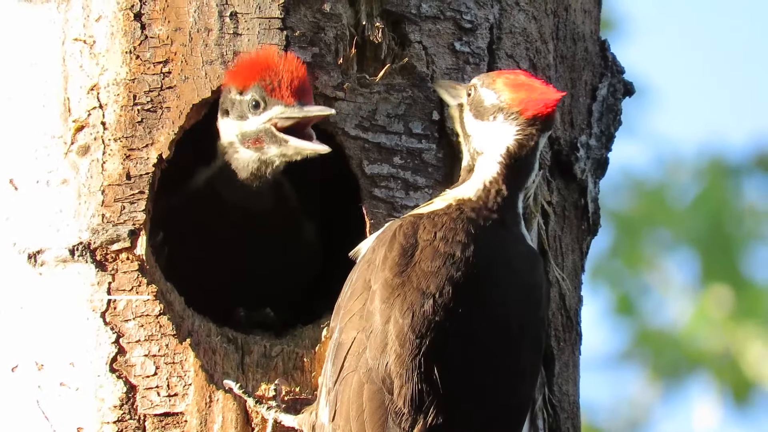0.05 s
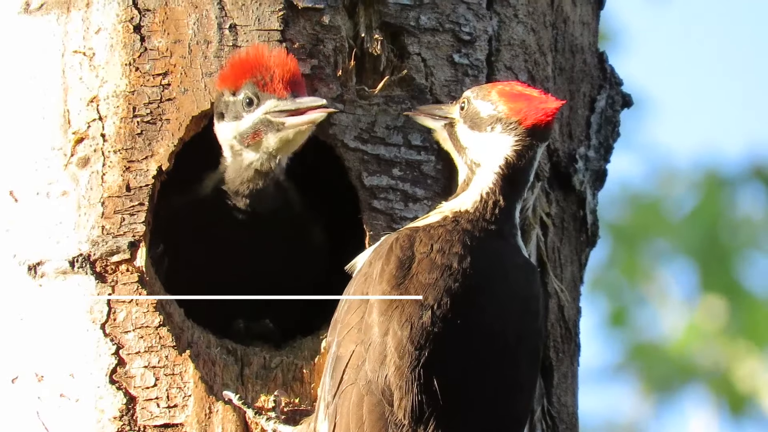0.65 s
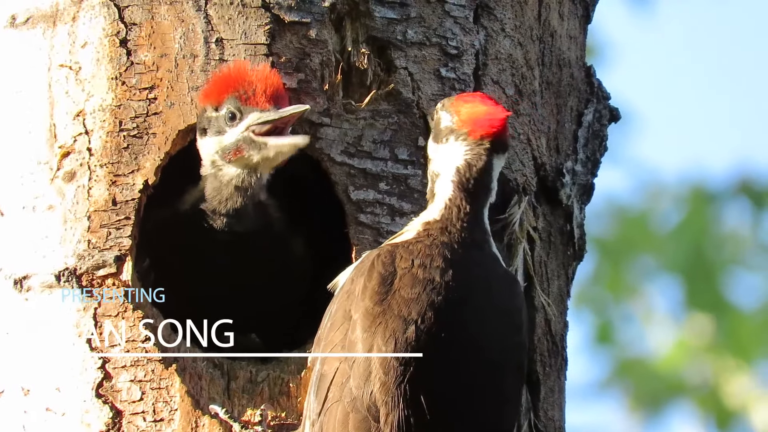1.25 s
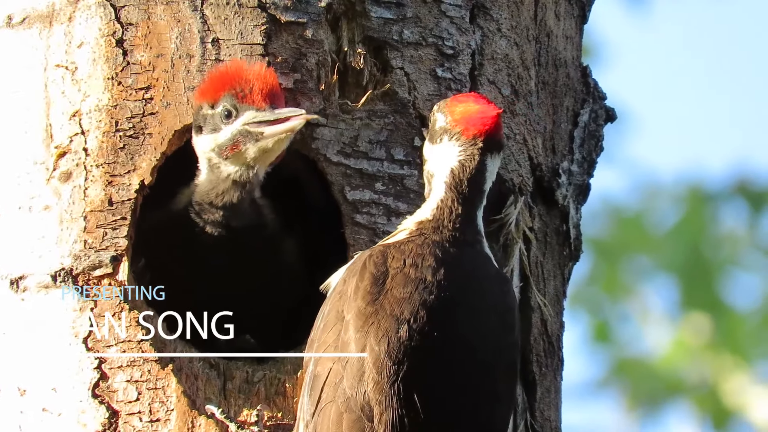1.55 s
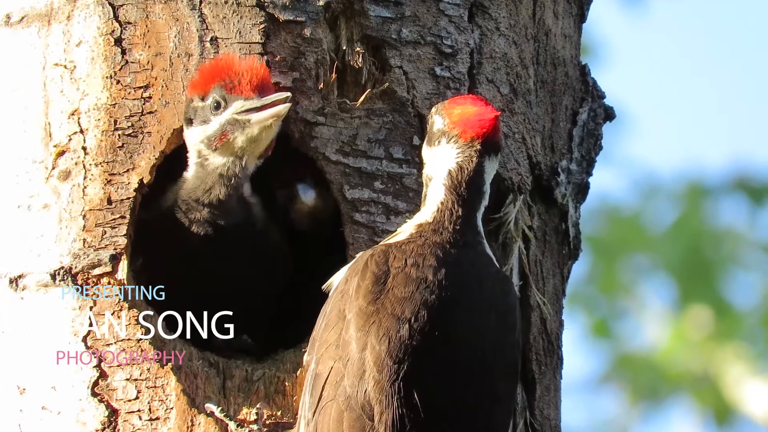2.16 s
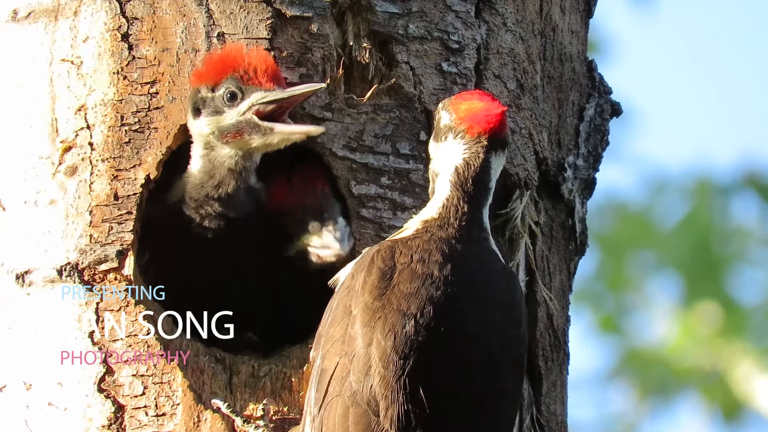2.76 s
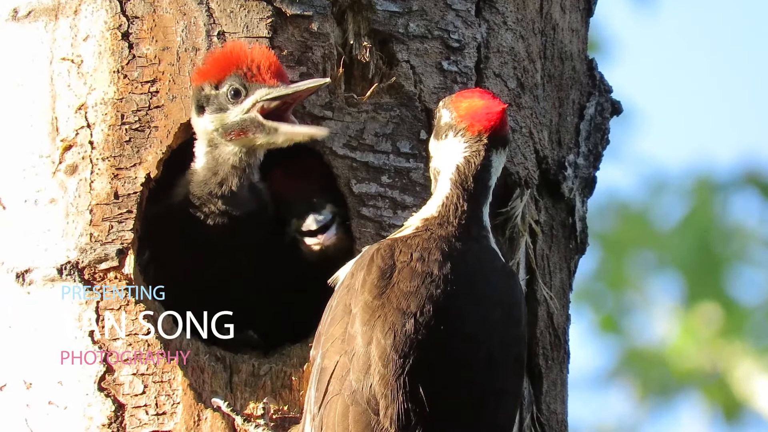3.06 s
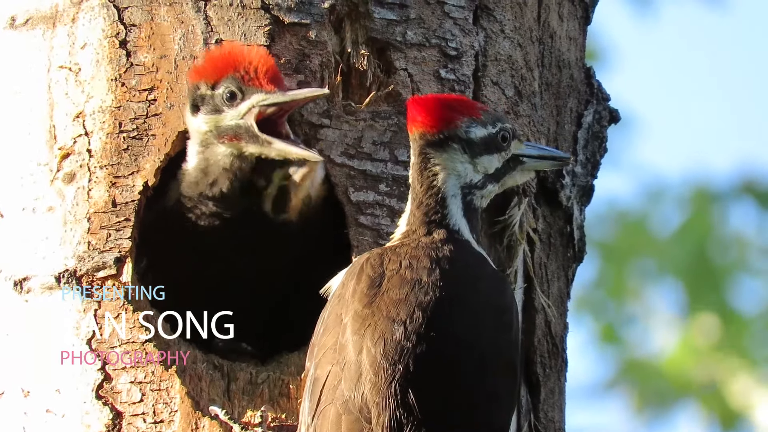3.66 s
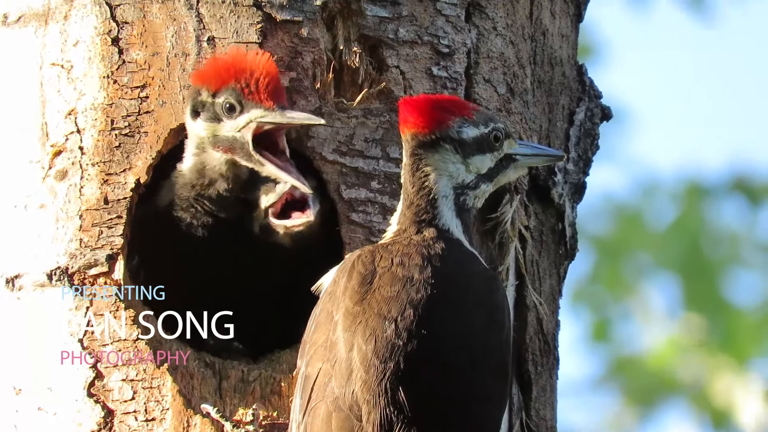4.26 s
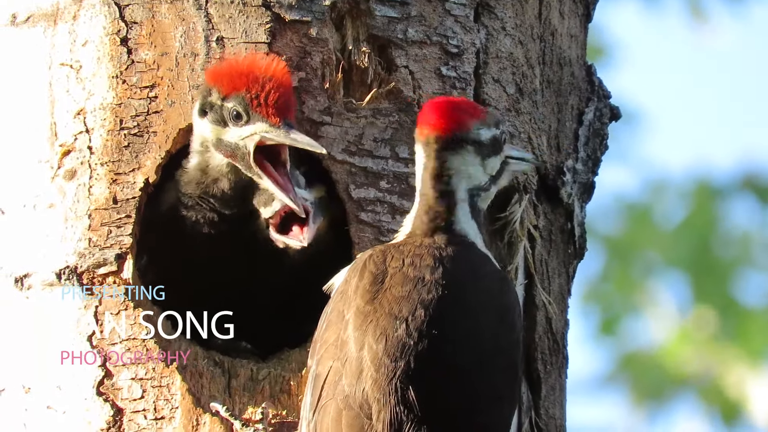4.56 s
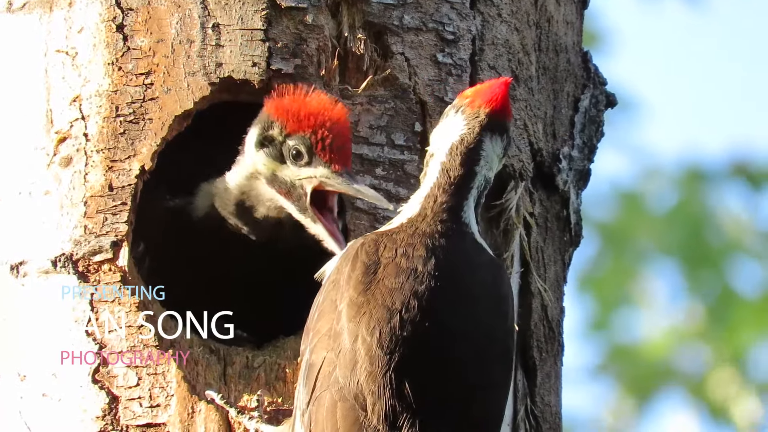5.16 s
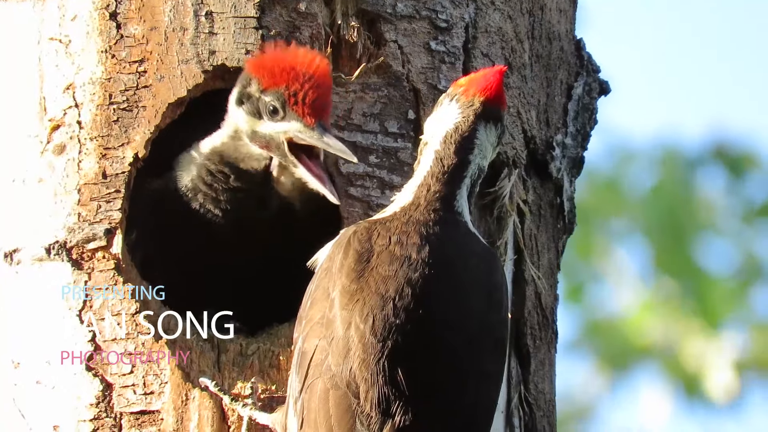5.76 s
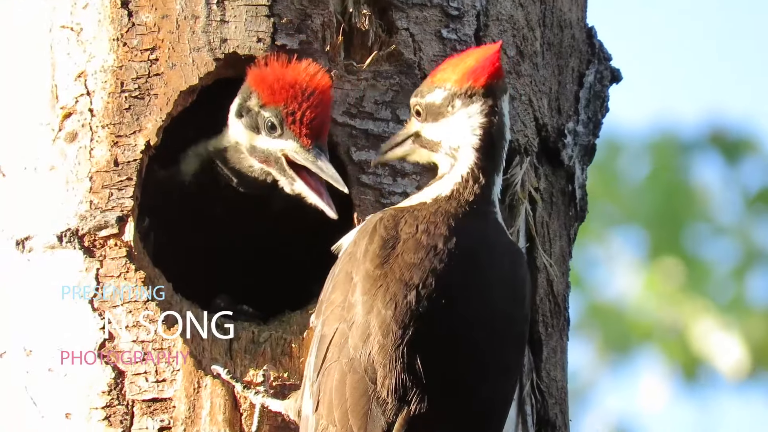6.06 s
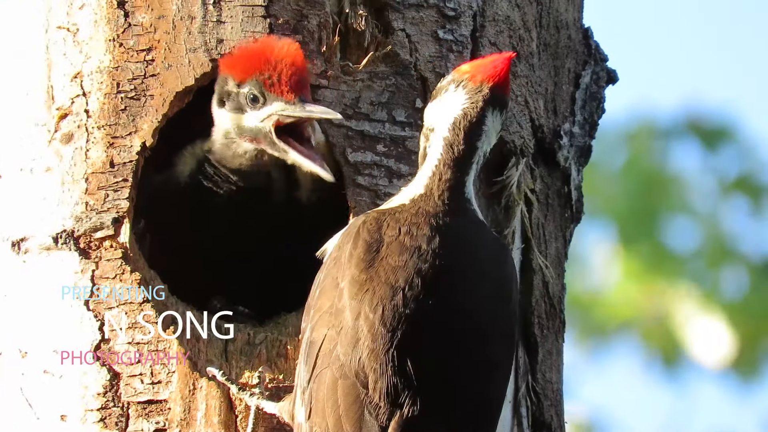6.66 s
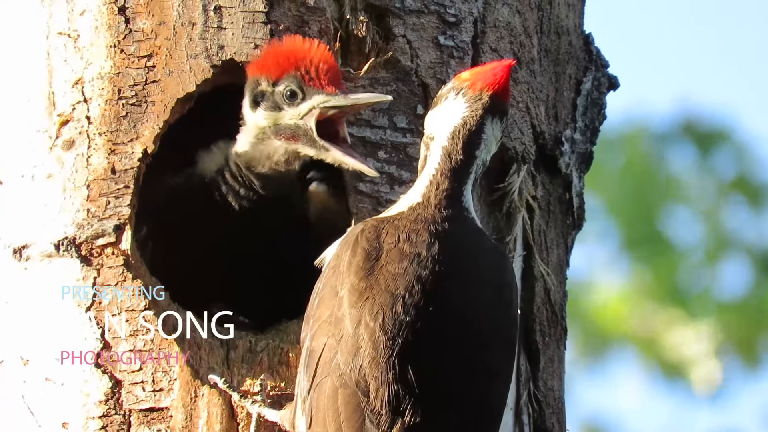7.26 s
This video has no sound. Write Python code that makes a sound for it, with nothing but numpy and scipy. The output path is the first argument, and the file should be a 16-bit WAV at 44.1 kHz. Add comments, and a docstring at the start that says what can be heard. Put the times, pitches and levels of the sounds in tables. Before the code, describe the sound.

Outdoors among trees, a young woodpecker squawks for food in a steady, rasping rhythm from start to finish, its voice ringing slightly in the nest hollow. Light taps on wood, brief crackles and thin bird whistles come in between. A low wash of far traffic lies behind the calls and swells a little once, after the middle, as a distant vehicle passes.

```python
"""Far traffic washes from the start. A woodpecker nestling begs from its hole in a trunk: raspy squawks,
three or four a second, each a train of uneven clicks ringing in its throat, then in the hollow and woods.
Small knocks on wood, scratchy crackles and faint whistles of other birds fall in between.
For four seconds a stretch of six squawks goes round in a loop; a brief crackly hiss fades as it ends.
The begging runs on, changing colour as the head moves, and a far vehicle swells past at about 5.4 s."""
import sys
import numpy as np
from scipy import signal
from scipy.fft import rfft, irfft, next_fast_len
from scipy.io import wavfile

SR = 44100
rng = np.random.default_rng(int(sys.argv[2]) if len(sys.argv) > 2 else 0)


def inscribe(sig):
    """Save sig as 16-bit PCM at rate SR to the path in sys.argv[1].

    A 1-D sig is mono; a 2-D sig holds one channel per row.
    Samples are clipped to [-1, 1] before scaling.
    """
    pcm = np.round(np.clip(np.atleast_2d(sig).T, -1, 1) * 32767)
    wavfile.write(sys.argv[1], SR, pcm.astype(np.int16))


N = 326781
TIME = np.arange(N) / SR


def from_db(db):
    return 10 ** (np.asarray(db) / 20)


def rms(x):
    return np.sqrt(np.mean(x ** 2) + 1e-20)


def at_hz(points, hz):
    """Reads a curve on a log-frequency axis."""
    freqs, values = np.transpose(points)
    return np.interp(np.log(hz + 1e-6), np.log(freqs), values)


def band(x, low_hz, high_hz, order=3):
    """Causal band-pass."""
    return signal.sosfilt(signal.butter(order, [low_hz, high_hz], "band", fs=SR, output="sos"), x)


def colour(x, spectrum):
    """Minimum-phase EQ: it rings after each click, never before."""
    size = next_fast_len(x.shape[-1] // 2 + 1024) * 2
    gain = from_db(at_hz(spectrum, np.fft.rfftfreq(size, 1 / SR)))
    cepstrum = irfft(np.log(gain))
    cepstrum[1:size // 2] *= 2
    cepstrum[size // 2 + 1:] = 0
    return irfft(rfft(x, size) * np.exp(rfft(cepstrum)))[..., :x.shape[-1]]


def isolate(x, low_hz, high_hz):
    """The share of a sound between two frequencies, with soft edges."""
    hz = np.fft.rfftfreq(x.shape[-1], 1 / SR) + 1
    return irfft(rfft(x) / (1 + (low_hz / hz) ** 24) / (1 + (hz / high_hz) ** 24), x.shape[-1])


def add(out, start_s, sound):
    """Mixes a sound in at its cue."""
    i = max(int(start_s * SR), 0)
    out[..., i:i + sound.shape[-1]] += sound[..., :N - i]


def arch(length_s):
    """A half-sine fade in and out."""
    return np.sin(np.linspace(0, np.pi, int(length_s * SR)))


def glide(pitches, size):
    """A pitch bending smoothly through its start, middle and end."""
    bend = np.polyfit([0, .5, 1], np.log(pitches), 2)
    return np.exp(np.polyval(bend, np.linspace(0, 1, size)))


def stereo_noise(spectrum):
    """A steady noise bed, centred in the bass and wider higher up."""
    # how alike the two ears are: f/Hz, likeness/0-1
    likeness = [(60, .998), (110, .992), (170, .82), (250, .22), (380, .35), (550, .78), (800, .78),
                (1200, .62), (2000, .45), (12000, .3)]
    size = next_fast_len(N)
    hz = np.fft.rfftfreq(size, 1 / SR)
    mid, side = rfft(rng.standard_normal((2, size))) * from_db(at_hz(spectrum, hz))
    alike = at_hz(likeness, hz)
    return irfft(np.sqrt(1 + alike) * mid + np.sqrt(1 - alike) * side * [[1], [-1]], size)[:, :N]


def traffic(wash_db=-44.5, rumble_db=-46.5, hum_hz=120, hum_db=-55, pass_s=5.4, pass_width_s=.24):
    """Far tyres and leaves wash over a faint hum; the engine rumble swells once as a vehicle passes."""
    # colour of tyres and leaves: f/Hz, level/dB
    wash_eq = [(90, -25), (170, -3), (260, -2), (380, 1), (600, 0), (830, -1), (1050, -6), (1300, -12),
               (1800, -19), (2500, -25), (5000, -33), (9000, -42), (13000, -52), (16000, -64)]
    # colour of far engines: f/Hz, level/dB
    engine_eq = [(20, -25), (32, -16.5), (45, -14), (65, -1), (100, 0), (125, -0.5), (160, -2.5), (200, -8),
                 (260, -13.5), (500, -56)]
    wash, engines = stereo_noise(wash_eq), stereo_noise(engine_eq)
    wash = wash * from_db(wash_db) / rms(band(wash.mean(axis=0), 200, 1100))
    swell_db = 4 / (1 + ((TIME - pass_s) / pass_width_s) ** 2)
    rumble = from_db(rumble_db + swell_db) * engines / rms(engines)
    hum = from_db(hum_db) * np.sqrt(2) * np.sin(2 * np.pi * hum_hz * TIME)
    return wash + rumble + hum


def knocks(contact_s=.00057, crack_db=-9, crack_s=.0018):
    """A short dry crack sets the wood ringing for a moment, differently at every touch."""
    # small knocks on wood: t/s, pitch/Hz, gain/dB
    cues = [(1.443, 1430, -43), (1.606, 1390, -42), (1.754, 800, -50), (4.057, 1400, -44),
            (4.32, 1410, -33), (5.975, 1460, -45), (6.056, 1500, -48), (6.308, 1380, -43),
            (7.115, 1380, -41), (7.316, 1420, -37.5), (7.368, 1350, -37)]
    # modes of the wood: multiple of the pitch, level/dB, t60/s
    wood_modes = [(.72, -5, 0.014), (.86, -2, 0.012), (1, 3.5, 0.029), (1.13, -4, 0.013), (1.55, -3, 0.014),
                  (2.1, -17, .01)]
    out, t = np.zeros(N), TIME[:SR // 16]
    attack = 1 - np.exp(-t / contact_s)
    for start, hz, db in cues:
        ring = sum(from_db(mode_db - 60 * t / t60) * np.sin(2 * np.pi * (hz * ratio * t + rng.random()))
                   for ratio, mode_db, t60 in wood_modes)
        noise = band(rng.standard_normal(len(t)), 800, 2500, order=1)
        crack = from_db(crack_db) * noise / rms(noise) * np.exp(-t / crack_s)
        add(out, start, from_db(db) * (ring + crack) * attack)
    return out


def reflections(size):
    """Countless reflections as the two ears get them."""
    # stereo width of the reflections: f/Hz, side against mid/dB
    width_eq = [(1000, -3), (3000, -11.5), (6000, -6), (12000, 1)]
    mid, side = rng.standard_normal((2, size))
    return mid + colour(side, width_eq) * [[1], [-1]]


def trunk(x, scatter_s=.01, scatter_db=-8):
    """Rough bark scatters early reflections behind the direct sound, in a new pattern each time."""
    t = TIME[:SR // 16]
    tail = np.exp(-t / scatter_s) * (t > .0005)
    response = from_db(scatter_db) * reflections(len(t)) * tail / np.linalg.norm(tail)
    response[:, 0] = 1   # the direct sound
    return signal.fftconvolve(x[None], response, axes=1)


def woods(x, t60_s=.62, send_db=-11, build_s=.013):
    """The trees around throw back a long, bright reverb tail."""
    # colour of the echo: f/Hz, gain/dB
    echo_eq = [(1000, -18), (2300, 5), (3200, 1), (3700, 9), (4300, 2.5), (6500, 3), (9000, -2.5),
               (14000, -5.5)]
    t = TIME[:SR]
    tail = from_db(-60 * t / t60_s) * (1 - np.exp(-t / build_s))
    response = from_db(send_db) * colour(reflections(SR) * tail, echo_eq) / np.linalg.norm(tail)
    return signal.fftconvolve(x[None], response, axes=1)[:, :N]


def effort(t, rise_s, swell_db, curve=1.31, release_db_per_s=275):
    """Effort of one squawk in dB against its peak: a swell that flattens out, then a steady release."""
    rise_db = -swell_db * np.clip(1 - t / rise_s, 1e-9, 1) ** curve
    return rise_db - release_db_per_s * np.maximum(t - rise_s, 0)


def syrinx(size, click_hz=(385, 395, 490), rate_spread=.05, jitter=.1, shimmer_db=1, puff_s=.0018):
    """The membranes snap at an uneven rate; air hisses after each snap, more as the call strains."""
    rates = np.array(click_hz) * np.exp(rate_spread * rng.standard_normal(3))
    cycles = np.cumsum(glide(rates, size)) / SR
    timing, strength = rng.standard_normal((200, 2)).T
    at = np.searchsorted(cycles, np.cumsum(1 + jitter * timing))
    clicks = np.zeros(size)
    clicks[at[at < size]] = from_db(shimmer_db * strength[at < size])
    airflow = signal.lfilter([1], [1, -np.exp(-1 / (puff_s * SR))], clicks)
    puffs = airflow * rng.standard_normal(SR)[:size]
    # a snap bounces up and down the windpipe, a fraction of a millisecond per trip
    pipe = np.r_[1, np.zeros(rng.integers(9, 16)), .5]
    snaps = signal.lfilter(pipe[::-1], pipe, clicks)
    breathiness = .92 + .2 * np.linspace(0, 1, size) ** 2
    return snaps / rms(snaps) + breathiness * puffs / rms(puffs)


def head_pose(x, start_s):
    """The voice changes colour as the head faces out, turns, bows and lifts."""
    # colour of the voice in each pose: f/Hz, level/dB
    facing_out = [(760, -43), (1300, -14), (1500, -12), (2030, -5.5), (2370, -7), (2710, 1), (3740, 1),
                  (4030, -5), (4800, -6.5), (5550, -12.5), (7900, -12.5), (12000, -20.5), (13800, -27.5),
                  (15500, -76)]
    turning = [(760, -38), (1300, -15.5), (1520, -11), (1670, -13.5), (2210, -9), (2400, -13), (2770, 1),
               (3450, 0), (3670, -1), (3940, -6.5), (5490, -13), (6100, -12.5), (9040, -17), (12300, -25.5),
               (15500, -46)]
    bowed = [(760, -36), (1300, -9), (1500, -7.5), (1720, -12.5), (2030, -4.5), (2300, -8), (2770, 2.5),
             (3780, 0.5), (4610, -8), (5550, -11.5), (6350, -9.5), (8850, -13.5), (9620, -16),
             (13800, -25.5), (15500, -68)]
    lifted = [(1000, -10), (1500, -12), (2100, -3.5), (2450, -1), (2950, 11), (3600, 4), (4200, -11),
              (5300, -10), (6200, -18), (7300, -7), (8800, -16), (10500, -20), (12500, -28), (15500, -55)]
    # moves to the next pose: t/s
    moves = [4.0, 5.2, 7.1]
    return colour(x, [facing_out, turning, bowed, lifted][np.searchsorted(moves, start_s)])


def gape(x):
    """Tongue and beak sit differently for every squawk, which shifts the upper resonances most."""
    hz = np.arange(1500, 15000, 450)
    ripple_db = np.interp(hz, [3000, 6000], [.8, 1.4])
    return colour(x, np.column_stack([hz, ripple_db * rng.standard_normal(len(hz))]))


def nestling(attack_s=.035, release_s=.08, fade_out_s=.026, resonance_per_effort=.19):
    """Clicks ring in the throat, whose resonance swells with effort; each squawk bounces off the trunk."""
    # begging calls: t/s, rise/s, peak rasp gain/dB, swell/dB, peak resonance over the rasp/dB
    squawks = [(1.208, 0.14, -51, 11.1, 2), (1.456, 0.12, -44.5, 21, 1.5), (1.792, 0.13, -43.9, 5.5, 2.5),
               (2.08, 0.12, -46, 3.5, 2.5), (2.391, 0.11, -47.5, 2, 2), (2.677, 0.12, -43, 6, 2),
               (2.946, 0.14, -41.5, 8.5, 3.5), (4.097, 0.12, -41, 6.5, 3.5), (4.38, 0.12, -41, 6, 2),
               (4.687, 0.132, -42, 8.5, 2.2), (4.947, 0.12, -42, 12, 1.5), (5.224, 0.14, -47.5, 11.5, 4),
               (5.53, 0.129, -44, 5.5, 3), (5.793, 0.12, -44.5, 10, 1.5), (6.083, 0.13, -45.5, 2, 1),
               (6.343, 0.11, -44, 9, 1.5), (6.642, 0.13, -46, 2.3, 1), (6.88, 0.11, -45.5, 12.5, 2.4),
               (7.154, 0.138, -48.2, 8, 5.5)]
    out = np.zeros((2, N))
    for start, rise_s, rasp_db, swell_db, resonance_db in squawks:
        t = np.arange(0, rise_s + release_s, 1 / SR)
        effort_db = effort(t, rise_s, swell_db)
        voice = gape(head_pose(syrinx(len(t)), start))
        core = isolate(voice, 2400, 4200)
        rasp = (voice - core) / rms(isolate(voice, 4500, 14000))
        resonance = from_db(resonance_db + resonance_per_effort * effort_db) * core / rms(core)
        fades = np.clip(np.minimum(t / attack_s, (t[-1] - t) / fade_out_s), 0, 1)
        add(out, start, trunk((rasp + resonance) * fades * from_db(rasp_db + effort_db)))
    return out


def hollow(x):
    """The cavity behind the bird rings in narrow modes."""
    # modes of the nest hollow: f/Hz, gain/dB, t60/s
    cavity_modes = [(2660, -3, .04), (2823, -4, .04), (3010, -3, .05), (3295, -3, .06), (3470, -3, .05),
                    (3666, 1, .11), (4086, -6, .05)]
    out = np.zeros(N)
    for hz, db, t60 in cavity_modes:
        decay = from_db(-60 / (t60 * SR))
        gain = (1 - decay ** 2) / 2
        feedback = [1, -2 * decay * np.cos(2 * np.pi * hz / SR), decay ** 2]
        out += from_db(db) * signal.lfilter([gain, 0, -gain], feedback, x + 1e-18)
    return out


def crackles(snaps_per_s=1500, spread_db=6):
    """Scratchy bursts of tiny snaps; the one at 4.04 s is a brief crackly hiss fading as the loop ends."""
    # crackle bursts: centre t/s, length/s, level/dB
    bursts = [(1.995, 0.031, -57), (2.042, 0.052, -50.5), (2.078, 0.038, -58), (4.04, 0.15, -52.5),
              (5.992, 0.11, -53.5), (6.08, 0.067, -52.5), (6.314, 0.1, -51.5)]
    # colour of a snap: f/Hz, level/dB
    snap_eq = [(600, -40), (1500, 12.5), (3500, 9), (7000, 1), (11000, -3), (15000, -14)]
    envelope = np.zeros(N)
    for centre, length, db in bursts:
        add(envelope, centre - length / 2, from_db(db) * arch(length))
    snaps = rng.random(N) < snaps_per_s / SR
    strength = from_db(spread_db * np.clip(rng.standard_normal(N), -2, 2))
    grains = colour(snaps * strength * rng.choice([-1, 1], N), snap_eq)
    return envelope * grains / rms(grains)


def whistles(trim_db=-1, flutter_hz=220):
    """Other birds whistle thin, gliding tones with a hoarse flutter."""
    # whistles: t/s, length/s, first f/Hz, middle f/Hz, last f/Hz, level/dB, flutter-to-tone ratio
    cues = [(3.104, 0.114, 3200, 3176, 2770, -48.5, 1.5), (4.044, 0.073, 2750, 2800, 2690, -50, 0.69),
            (4.255, 0.088, 2900, 2570, 2430, -51, .7), (4.262, 0.084, 3500, 3360, 3270, -52, 1.1),
            (5.42, 0.16, 3650, 5300, 4570, -56, 2.5), (6.534, 0.093, 3200, 3200, 3270, -50.5, 1.2),
            (6.541, 0.13, 2720, 2710, 2660, -53.5, 0.83), (7.324, 0.12, 3200, 2950, 2900, -53, 1.2)]
    out = np.zeros(N)
    lowpass = signal.butter(2, flutter_hz, fs=SR, output="sos")
    for start, length, first, middle, last, db, roughness in cues:
        shape = arch(length)
        flutter = signal.sosfilt(lowpass, rng.standard_normal((2, SR)))[:, :len(shape)]
        phase = 2 * np.pi * np.cumsum(glide((first, middle, last), len(shape))) / SR
        hoarseness = (flutter[0] * np.sin(phase) + flutter[1] * np.cos(phase)) / rms(flutter)
        tone = np.sin(phase) + roughness * hoarseness
        add(out, start, from_db(trim_db + db) * shape * tone / rms(tone))
    return out


def scene(voice_db=-1, hollow_db=-7):
    """Birds at the trunk, their echoes, and the road far behind."""
    voice = from_db(voice_db) * nestling()
    cavity = from_db(hollow_db) * hollow(voice.mean(axis=0))
    small_sounds = trunk(whistles() + knocks() + crackles())[:, :N]
    birds = voice + cavity + small_sounds
    return birds + woods(birds.mean(axis=0)) + traffic()


def record(dry, loop_from_s=1.437, loop_length_s=1.73732, loop_until_s=4.04, cutoff_hz=16200):
    """One stretch loops with hard cuts through the opening; a steep low-pass takes off the very top."""
    n, start, length = np.arange(N), round(loop_from_s * SR), round(loop_length_s * SR)
    playhead = np.where(TIME < loop_until_s, start + (n - start) % length, n)
    lowpass = signal.cheby2(14, 70, cutoff_hz, fs=SR, output="sos")
    return signal.sosfilt(lowpass, dry[:, playhead])


dry = scene()
out = record(dry)
inscribe(out)
```